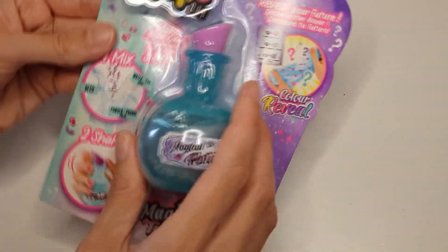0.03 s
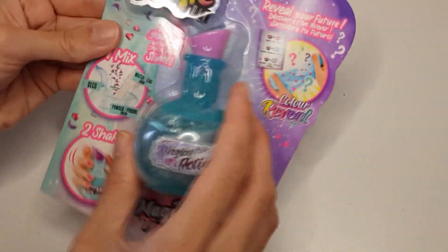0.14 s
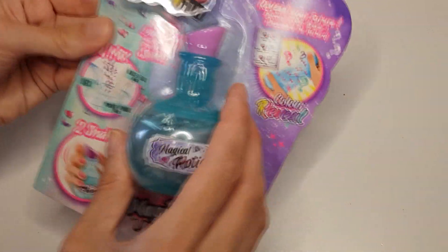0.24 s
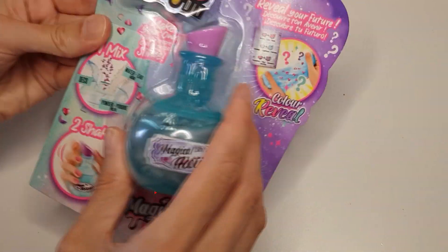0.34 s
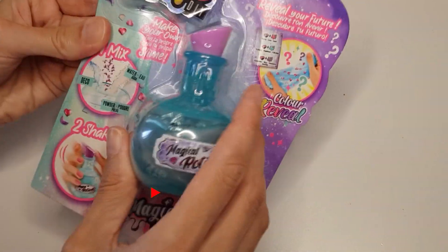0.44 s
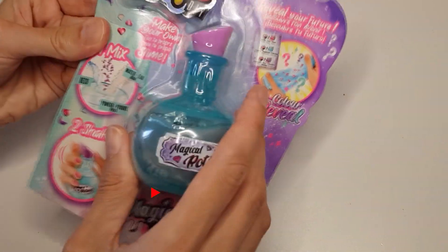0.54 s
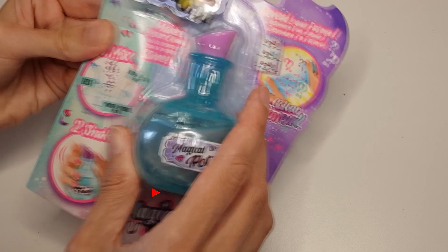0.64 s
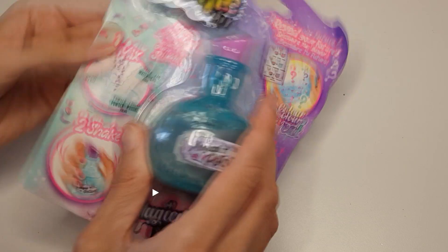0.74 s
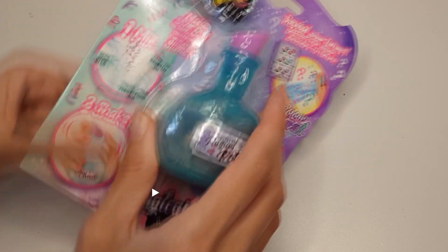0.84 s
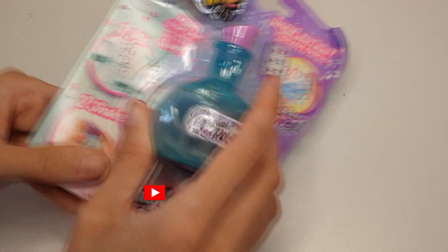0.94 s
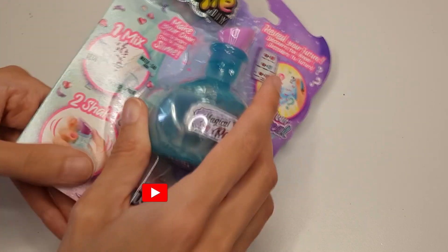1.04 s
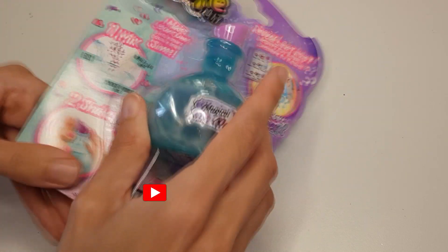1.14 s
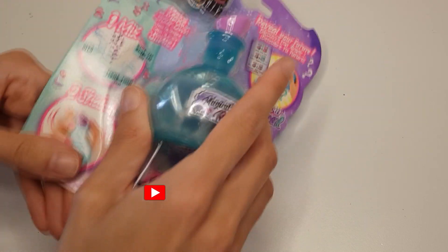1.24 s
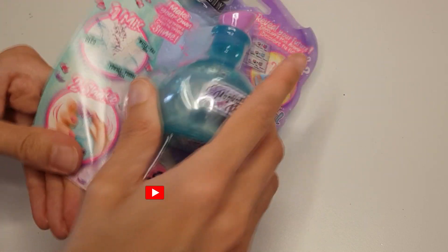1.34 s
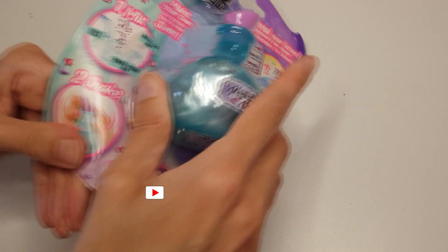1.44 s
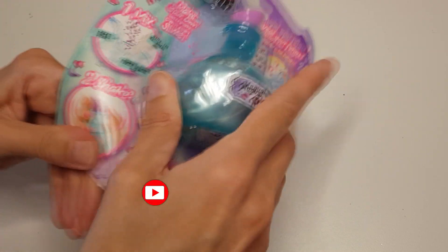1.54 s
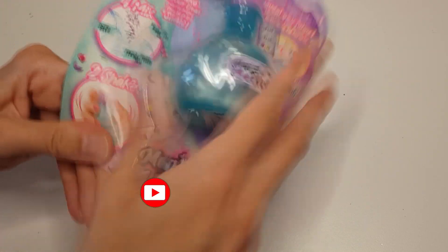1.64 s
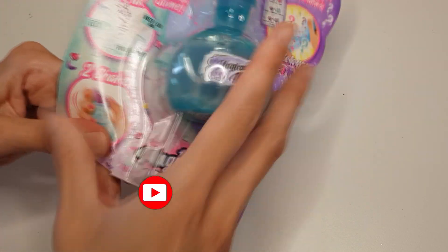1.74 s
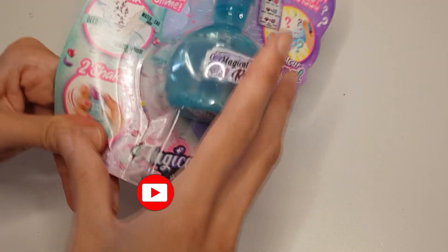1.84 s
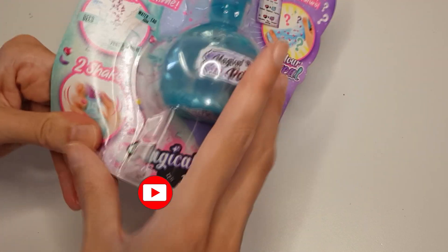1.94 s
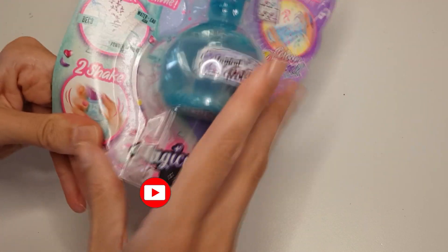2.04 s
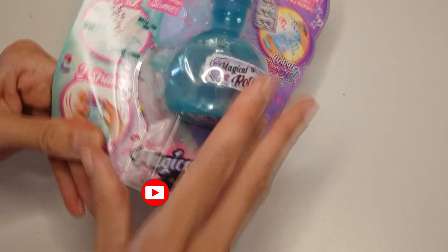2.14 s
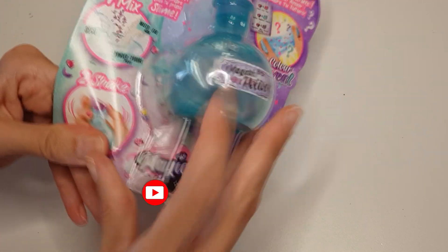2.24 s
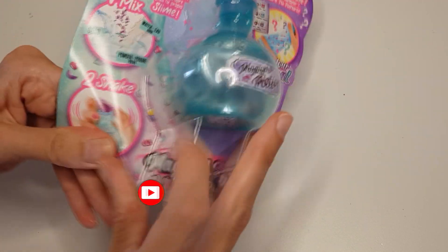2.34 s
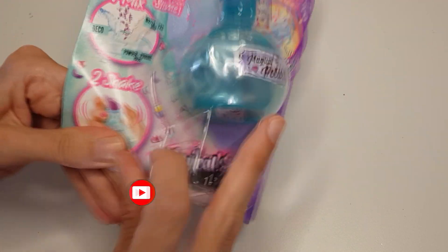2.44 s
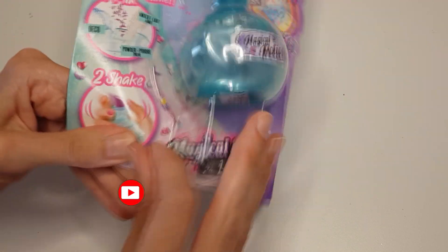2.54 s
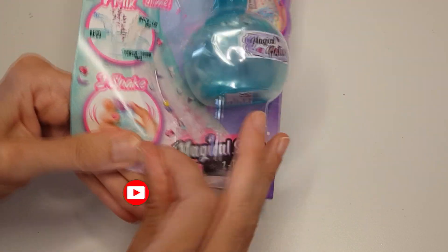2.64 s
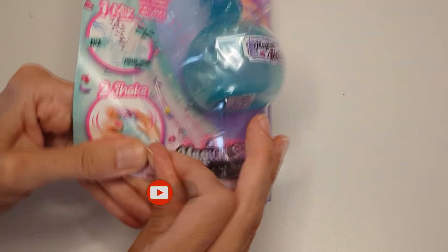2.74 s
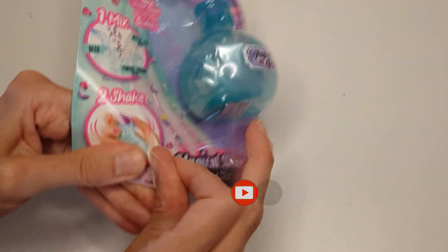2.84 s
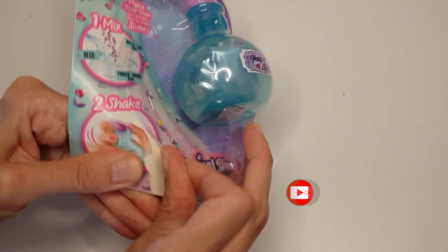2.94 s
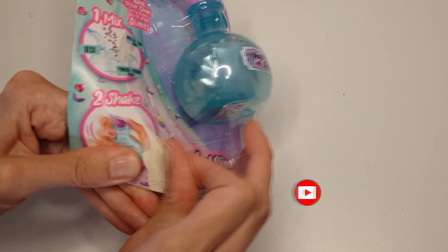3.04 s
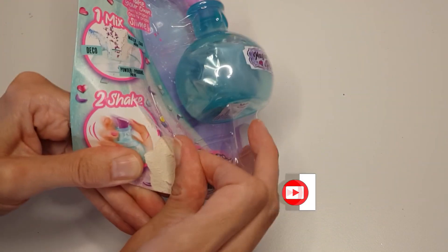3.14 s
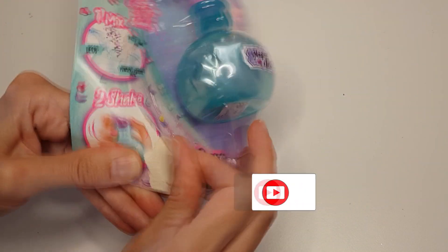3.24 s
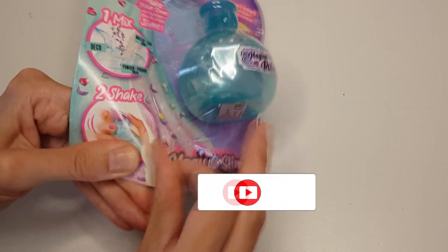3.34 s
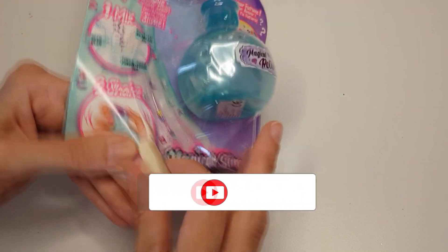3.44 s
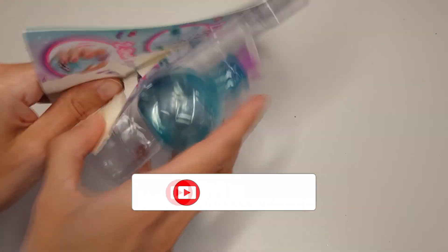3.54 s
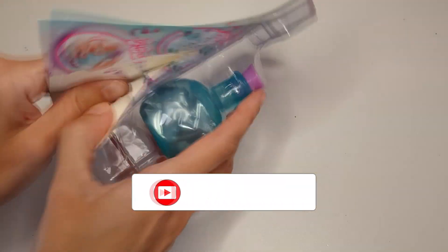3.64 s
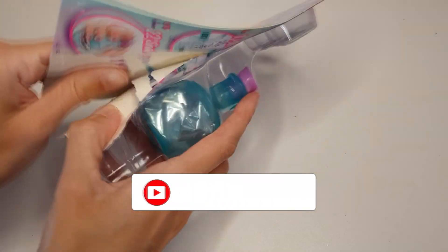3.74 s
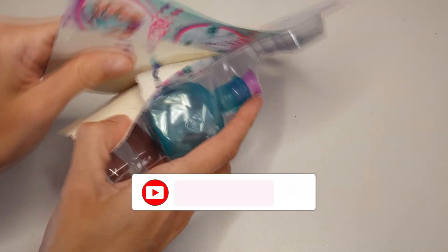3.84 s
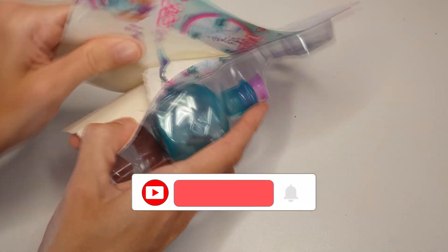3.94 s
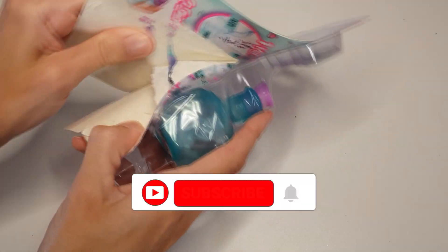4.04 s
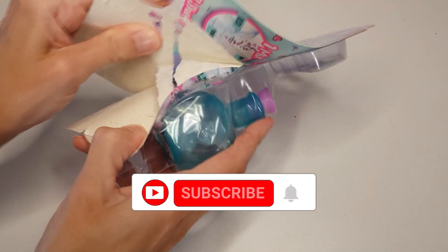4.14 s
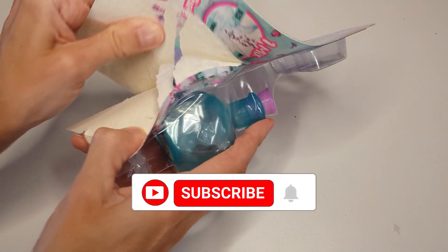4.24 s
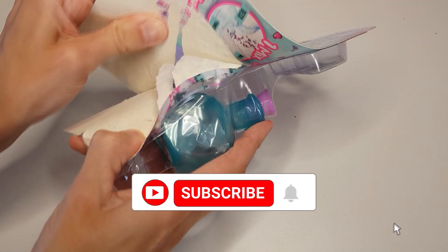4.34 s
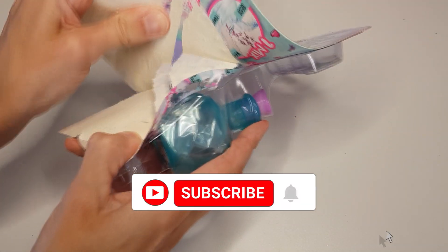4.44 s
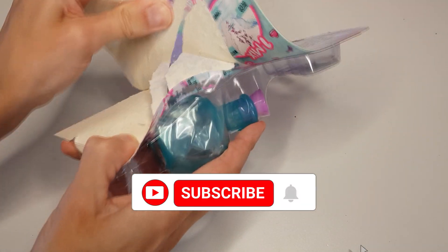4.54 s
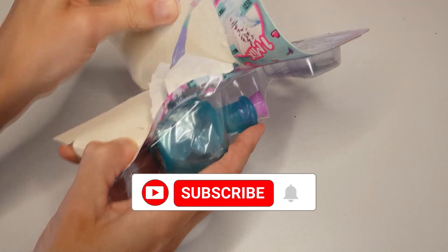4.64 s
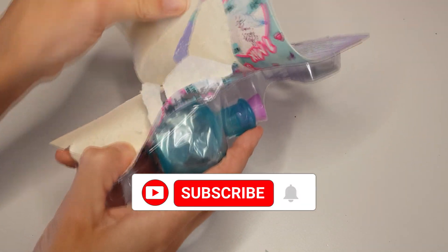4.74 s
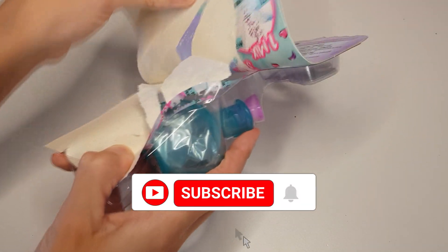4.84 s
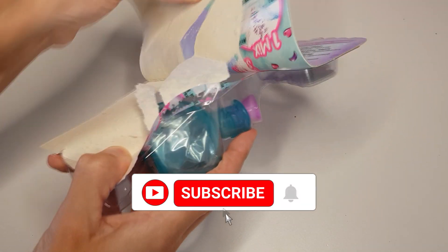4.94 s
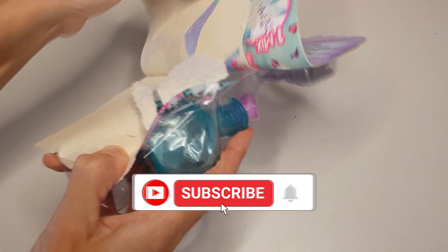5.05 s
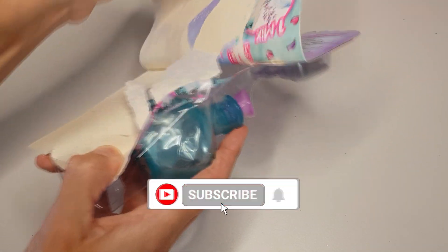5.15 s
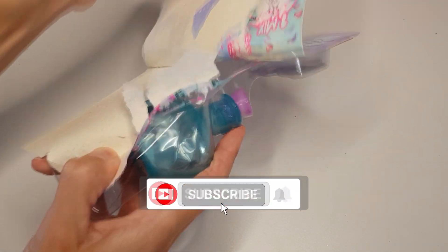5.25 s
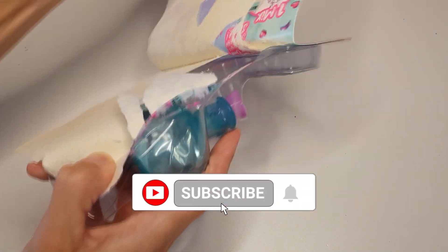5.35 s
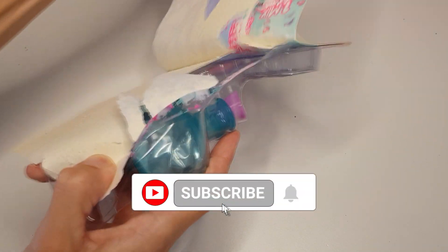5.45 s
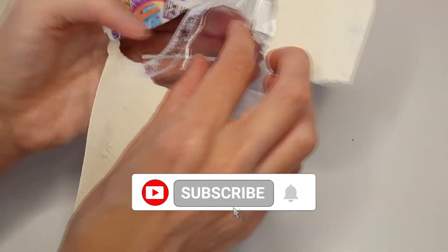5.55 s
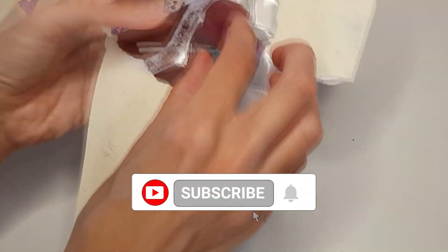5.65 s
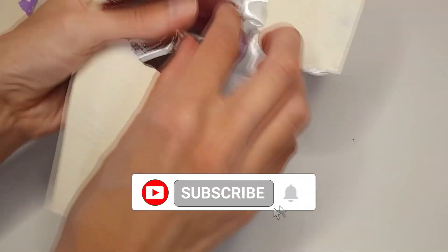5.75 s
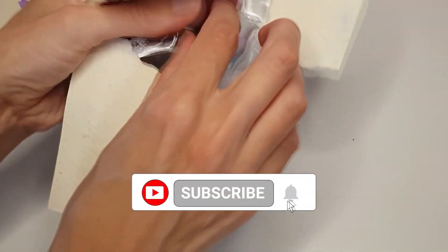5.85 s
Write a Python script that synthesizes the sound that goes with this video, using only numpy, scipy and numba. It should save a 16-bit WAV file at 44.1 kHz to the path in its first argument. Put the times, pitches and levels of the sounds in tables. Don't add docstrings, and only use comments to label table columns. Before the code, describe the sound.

Close and dry above a tabletop: soft skin and card rubs, a small cluster of plastic pops, one bright crack, then peeling ticks and a soft knock. After a loud hollow pop the card snaps and rips in a thick crackle, strongest between four and a half and five and a half seconds. Brief small-room reflections, faint hum, slight breaks at scene changes.

```python
import sys
import numpy as np
from scipy import signal
from scipy.fft import rfft, irfft, next_fast_len
from scipy.io import wavfile
from scipy.ndimage import uniform_filter1d
from numba import njit

SR = 44100
rng = np.random.default_rng(int(sys.argv[2]) if len(sys.argv) > 2 else 0)


def put_to_file(sound):
    columns = np.atleast_2d(sound).T
    safe = np.clip(columns, -1, 1)
    whole_steps = np.round(safe * 32767)
    wavfile.write(sys.argv[1], SR, whole_steps.astype(np.int16))


def elevation(decibels):
    levels = np.asarray(decibels, float)
    return 10 ** (levels / 20)


N = 259515

# frequency in Hz, density in dB per Hz.
HUM_TONE = [(8.8, -41.5), (15, -1.5), (59, 6), (124, 5), (210, -5.5), (298, -5.5), (739, -20.5),
            (1330, -19), (3490, -26), (5260, -28), (7260, -29.5), (15100, -25.5), (16500, -60.5)]
HUM_DB = -67.5
# time in seconds, level in dB.
RUMBLE = [(0.0, -68), (0.8, -60.5), (1.64, -68), (2.8, -65.5), (2.85, -62.5), (4.44, -73), (4.57, -92),
          (5.88, -74)]
EDITS_S = [0, 3.218, 3.52, 5.592, 6]
CUT_S = 0.004
# frequency in Hz, decay by 60 dB in seconds, level in dB.
ROOM = [(196, 0.11, 9), (600, 0.41, -1), (1200, 0.41, -1.5), (2870, 0.46, -4.5), (8000, 0.35, -1),
        (11900, 0.43, 2), (16000, 0.21, 0)]

# start in seconds, level in dB.
KNOCKS = [
    (0.744, -52),
    (1.337, -58.5),
    (2.881, -45.5),
    (5.757, -58),
]
KNOCK_HZ, KNOCK_FADE_S = 170, 0.036
# loudest moment, rise and fall in seconds,
# level in dB, pitch in Hz. Rise and fall of every stroke span 20 dB.
SLIDES = [(.07, 0.64, 0.12, -56, 1870), (.07, 0.45, 0.19, -60.5, 3900), (.4, 0.4, 0.5, -76.5, 5140),
          (1.11, 0.027, 0.066, -65, 5450), (1.11, .03, 0.097, -71, 2550), (1.92, 0.081, 0.098, -70, 4830),
          (1.936, 0.11, 0.078, -73.5, 7050), (2.24, .03, 0.059, -65, 11300), (2.36, .2, 0.11, -65, 1270),
          (2.67, 0.088, 0.5, -72, 3500), (3.74, 0.032, 0.047, -52.5, 1660)]
SLIDE_WIDTH = 0.11
SQUEAK_S, SQUEAK_LENGTH_S, SQUEAK_DB = 2.115, 0.02, -64
SQUEAK_HZ, SQUEAK_SAG_HZ_PER_S = 2100, 40000

BANDS_HZ = [(120, 650), (650, 2400), (2400, 8000), (8300, 17000), (400, 2600)]
PALM, SHELL, CARD, FILM, DENTED_SHELL = range(5)
# frequency in Hz, density in dB per Hz.
PACK_TONE = [(88, -84), (150, -22.5), (260, -17.5), (425, -0.5), (643, -10.5), (723, -1.5), (916, -1.5),
             (1120, -3), (1860, -8), (2550, -7), (3600, -7), (5070, -8.5), (7660, -17), (11600, -4.5),
             (14200, -7.5), (15600, -13), (16500, -66)]

# loudest moment, rise and fall in seconds, level in dB, shell pitch in Hz.
CREAKS = [(.04, 0.49, 0.24, -54, 1760), (.8, 0.026, 0.14, -62, 880), (.938, 0.0128, 0.12, -52.5, 910),
          (.98, .1, 0.12, -59.5, 897), (5.68, 0.032, .05, -48.5, 1200), (1.015, 0.094, 0.046, -56.5, 955),
          (.69, 0.086, .02, -66, 1110), (2.87, 0.16, 0.12, -66.5, 895), (2.9, .03, 0.47, -51.5, 890),
          (3.23, 0.0076, 0.15, -41.5, 1300), (3.27, 0.036, 0.038, -34.5, 900),
          (3.856, 0.013, 0.039, -41, 1490), (3.335, 0.014, 0.3, -49.5, 935),
          (3.568, 0.089, 0.15, -43.5, 1490), (3.725, 0.009, 0.31, -51, 1560),
          (5.767, 0.33, 0.024, -47, 1290), (5.875, 0.097, .1, -40, 1390)]
# loudest moment, rise and fall in seconds, level in dB, card pitch in Hz.
RUBS = [
    (.03, 0.67, 0.29, -60.5, 2200),
    (1.102, 0.016, 0.13, -66, 6800),
    (1.385, 0.09, 0.33, -50.5, 3320),
    (1.595, .03, 0.26, -55.5, 3400),
    (2.02, 0.017, 1.1, -59, 4900),
    (2.9, 0.035, 0.058, -37, 3400),
    (3.53, 0.015, 0.12, -41.5, 2900),
    (3.255, 0.058, 0.12, -48, 3600),
    (3.95, 0.021, 0.3, -47.5, 4800),
    (.74, 0.018, .08, -47, 5200),
]
# loudest moment, rise and fall in seconds, level in dB.
PEELS = [
    (.848, 0.016, 0.052, -49.5),
    (2.402, 0.087, 0.17, -58),
    (2.9, 0.027, 0.44, -55.5),
    (3.07, 0.042, 0.069, -40),
    (3.1, 0.033, 0.052, -41),
    (2.78, .03, .06, -47.5),
    (2.665, 0.036, .08, -47.5),
    (2.894, 0.3, 0.15, -49.5),
    (3.377, 0.04, 0.015, -71),
]
# loudest moment, rise and fall in seconds, level in dB.
GRIPS = [
    (.005, .1, 0.5, -62.5),
    (.8, 0.054, 0.016, -56),
    (1.6, .004, 0.066, -58),
    (2.405, 0.21, 0.18, -58),
    (2.885, 0.016, 0.071, -40),
    (4.55, 0.43, 0.46, -53.5),
    (3.232, 0.019, 0.11, -48),
    (.74, 0.013, .06, -47),
    (0.97, .06, 0.13, -65),
    (3.81, .02, 0.083, -56),
]
# level in dB, for palm, shell, card and film in turn.
CREAK_MIX = (-13, -3.5, -8, -18)
RUB_MIX = (-17.5, -14.5, -7.5, -13.5)
PEEL_MIX = (-15, -14, -9, -3.5)
GRIP_MIX = (1.5, -33, -22, -16)
# time in seconds, effort in dB, shell pitch in Hz.
PULL = [(3.93, -78, 1600), (4.02, -46, 1530), (4.11, -50.5, 1550), (4.16, -45.5, 1330), (4.25, -40.5, 1186),
        (4.31, -44.5, 1410), (4.4, -37, 1250), (4.5, -30.5, 1450), (4.57, -38.5, 1310), (4.62, -31, 1410),
        (4.75, -33.5, 1200), (4.81, -31.5, 1330), (4.92, -40, 1360), (4.995, -43, 1200), (5.015, -47, 1200),
        (5.21, -43, 1200), (5.4, -47, 1150), (5.588, -42.5, 1200)]
PULL_MIX = (-21, -2, -5, -5.5)
PULL_GROWTH = (1.57, 0.97, 0.79, 0.43)
PULL_CARD_HZ = 3740
# loudest moment, rise and fall in seconds, level in dB, shell pitch in Hz.
TUGS = [(5.045, 0.033, .12, -38, 1170), (5.14, 0.22, .12, -37, 1100), (5.248, 0.029, 0.054, -33, 1090),
        (5.225, 0.058, .04, -39, 1126), (5.264, 0.046, 0.048, -27.5, 1150), (5.31, .12, .15, -35.5, 1320),
        (5.42, 0.014, .04, -41, 1480), (5.445, 0.051, 0.056, -37, 1150), (5.477, 0.059, 0.071, -32, 1290),
        (4.24, 0.11, 0.064, -44.5, 1150), (4.81, .05, .06, -40, 1250), (4.98, .12, .03, -38, 1200),
        (5.57, 0.04, 0.11, -47, 1840)]
TUG_MIX = (-18, -0.5, -3, -2)

# start in seconds, level in dB, shell pitch in Hz, card edge in dB.
POPS = [(0.1867, -52, 964, -37), (.6966, -50.5, 950, -13), (.731, -33.5, 790, -8.5),
        (0.7362, -33.5, 820, -21), (0.7499, -24.5, 890, -14.5), (0.7819, -37.5, 845, -16),
        (.931, -49.5, 950, -20), (1.0117, -49, 835, -19), (1.303, -51.5, 850, -24), (2.8553, -37, 865, -29),
        (2.8745, -28.5, 883, -13.5), (3.2416, -35, 1130, -17), (3.263, -32.5, 900, -19),
        (3.3125, -14.5, 961, -34), (1.586, -47.5, 474, -19), (.738, -42, 487, -23), (3.285, -36, 1480, -14),
        (3.359, -35.5, 806, -5), (3.483, -45, 910, -26), (3.7773, -38, 1590, -5.5), (4.01, -41, 1510, -7),
        (4.072, -37.5, 1040, -12), (4.132, -41, 1120, -16), (4.21, -44.5, 1140, -10),
        (4.319, -44, 1280, -5), (4.394, -44, 1150, -6), (4.431, -43, 1160, -8), (4.474, -32, 1220, 0),
        (4.711, -39, 1080, -3), (4.858, -39, 1260, -10), (4.892, -37, 1320, -10), (4.944, -35, 1160, -12),
        (5.139, -32, 990, -10), (4.598, -31, 1500, -1), (4.6334, -28.5, 1270, -2), (4.681, -30, 1800, -6),
        (4.793, -28.5, 1350, -11), (5.099, -29, 1100, 1.5), (5.242, -27, 1105, -4), (5.42, -36, 1500, -10),
        (5.4654, -31, 1300, -5), (5.6094, -37.5, 1250, -5), (5.6423, -44.5, 1090, -3.5),
        (5.7556, -40.5, 580, 4), (5.8561, -39.5, 1160, 0.5)]
POP_CARD_HZ, POP_FILM_DB, POP_DULLING = 4300, 3.5, 0.42
# start in seconds, level in dB, card pitch in Hz, shell pitch in Hz.
SNAPS = [(1.511, -52.5, 4300, 1540), (1.5852, -33.5, 4240, 1970), (1.5994, -45, 4430, 970),
         (2.8812, -21, 3044, 1200), (3.231, -67, 3350, 447), (3.3125, -24, 2730, 2000),
         (3.5326, -40, 3720, 1680), (3.571, -30.5, 4740, 1410), (3.6126, -28.5, 3560, 1810),
         (3.719, -38.5, 3500, 1590), (3.7544, -37, 3200, 1650), (3.8492, -37, 3460, 1430),
         (3.925, -45, 4270, 1640), (3.9431, -35, 3660, 1770), (3.934, -44, 3500, 1610),
         (3.976, -48, 3460, 1670), (4.027, -36.5, 3860, 1230), (4.048, -39, 4300, 1690),
         (4.1087, -40.5, 3200, 1590), (4.1583, -43, 3600, 1310), (5.727, -45, 5000, 1900),
         (4.0, -42, 3430, 1600), (4.0167, -36, 3560, 1620), (4.085, -28, 3900, 1940),
         (4.257, -41, 4300, 1190), (4.4487, -35, 4040, 1310), (5.7181, -39.5, 2530, 1160)]
SNAP_SHELL_DB, SNAP_FILM_DB, SNAP_FILM_DB_PER_OCTAVE = -3.5, -7, 14
# start in seconds, level in dB, share of the card in dB.
TICKS = [(1.4456, -37.5, -26.5), (2.324, -66, 10.5), (2.406, -41, -15), (2.5865, -42, -33),
         (2.607, -33, -43), (2.618, -38, -28), (2.6218, -28, -42), (2.5678, -58, -30), (2.6718, -42, -10),
         (2.8693, -28.5, -14), (2.9938, -52, -15), (3.0492, -44, -15), (3.365, -52, -6), (2.657, -38, -15),
         (2.668, -34.5, -14), (2.7622, -35.5, -12), (2.778, -38, -12), (2.8113, -35.5, -12),
         (2.826, -34.5, -11.5), (3.0171, -34.5, -10), (3.0626, -30, -20), (3.073, -28, -10),
         (3.082, -33, -9), (3.0975, -35.5, 0), (3.1595, -47.5, -5), (3.192, -50, -11), (2.213, -51.5, -9),
         (3.9597, -37.5, 6), (3.9826, -41, 8.5), (4.059, -28, -4.5)]
TICK_CARD_HZ, TICK_SHELL_HZ, TICK_SHELL_DB = 4200, 1100, -36
# start in seconds, level in dB,
# share of the shell in dB, shell pitch in Hz, card pitch in Hz.
CRACKS = [(1.3359, -17, -8, 1010, 5740), (2.8642, -37, -7, 920, 3440), (3.3711, -32.5, -12, 765, 2860),
          (4.339, -31, -15, 1610, 5060), (4.51, -28.5, -3.5, 1800, 3340), (4.54, -41, -0.5, 1820, 4200),
          (4.7696, -10.5, -15.5, 1030, 5040), (4.8383, -18, -23, 1210, 5270),
          (4.8726, -29.5, -3.5, 1280, 3610), (4.9106, -30.5, -8, 1240, 4150), (4.9694, -40, 1, 1200, 3300),
          (4.2958, -37, -16, 1270, 3990), (4.368, -30.5, -11, 1330, 3820), (4.6217, -29, -18, 1540, 4150),
          (4.694, -27.5, -13, 1510, 3970), (5.346, -32, -9, 1420, 3560), (5.566, -38, 5.5, 1850, 4080),
          (5.0423, -35, -4, 1130, 2800), (5.0603, -21, -17, 1130, 3920), (5.261, -21.5, -1, 1150, 5200),
          (5.478, -33.5, 5, 1490, 3240), (5.574, -32.5, -23, 1180, 5760)]
CRACK_CARD_DB = -3.5


def unit(x):
    return x / np.sqrt(np.mean(x ** 2))


def crest(x):
    return x / np.abs(x).max(axis=-1, keepdims=True)


def colour(x, spectrum):
    hz, db = np.transpose(spectrum)
    n = next_fast_len(x.shape[-1])
    f = np.maximum(np.arange(n // 2 + 1) * SR / n, 1)
    gain = elevation(np.interp(np.log(f), np.log(hz), db))
    return irfft(rfft(x, n) * gain, n)[..., :x.shape[-1]]


def band(x, part):
    return signal.sosfilt(signal.butter(4, BANDS_HZ[part], "bandpass", fs=SR, output="sos"), x)


def walk(rate):
    hold = int(SR / rate)
    steps = np.repeat(rng.standard_normal(N // hold + 1), hold)
    return 0.68 * uniform_filter1d(uniform_filter1d(steps, hold), hold)[:N]


@njit
def resonate(x, hz, width):
    y, b, l = np.empty(len(x)), 0., 0.
    for i in range(len(x)):
        g, k = np.tan(np.pi * hz[i] / SR), width / hz[i]
        v = (b + g * (x[i] - l)) / (1 + g * (g + k))
        b, l, y[i] = 2 * v - b, l + 2 * g * v, k * v
    return y


def hum():
    s, db = np.transpose(RUMBLE)
    floor = unit(colour(rng.standard_normal(N), HUM_TONE)) * elevation(HUM_DB + 0.5 * walk(18.0))
    low = signal.sosfilt(signal.butter(2, 110, fs=SR, output="sos"), floor)
    swell_db = np.interp(np.arange(N) / SR, s, db) - HUM_DB
    return floor + low * (elevation(swell_db) - 1)


def cuts():
    t = np.arange(N) / SR
    return np.prod([np.clip(np.abs(t - s) / CUT_S, 0, 1) for s in EDITS_S[1:-1]], axis=0)


def room(x, wet_db, gap_s):
    t = np.arange(SR // 2) / SR
    hz, t60, db = np.transpose(ROOM)
    tail = 0
    for centre in 180 * 2 ** np.arange(0, 6.6, 0.5):
        edges = [centre / 2 ** 0.25, centre * 2 ** 0.25]
        sos = signal.butter(2, edges, "bandpass", fs=SR, output="sos")
        fade_db = np.interp(centre, hz, db) - 60 * t / np.interp(centre, hz, t60)
        tail = tail + signal.sosfilt(sos, rng.standard_normal(len(t))) * elevation(fade_db)
    tail = tail * (1 - np.exp(-(t / gap_s) ** 2)) * (1 + 3.24 * np.exp(-t / 0.0032))
    tail = tail * elevation(wet_db) / np.sqrt(np.sum(tail ** 2))
    cut = np.minimum((np.array(EDITS_S) * SR).astype(int), N)
    shots = [signal.fftconvolve(x[a:b], tail)[:b - a] for a, b in zip(cut, cut[1:])]
    return np.concatenate(shots)


def knocks():
    t = np.arange(N) / SR
    wood = unit(resonate(rng.standard_normal(N), np.full(N, 1. * KNOCK_HZ), 150.))
    return wood * sum(elevation(db) * (t > s) * np.exp(-np.abs(t - s) / KNOCK_FADE_S) for s, db in KNOCKS)


def stroke(t, s, rise, fall, db):
    return db - 20 * np.maximum((s - t) / rise, (t - s) / fall)


def slides():
    t, out = np.arange(N) / SR, 0
    skin = rng.standard_normal(N)
    for *shape, hz in SLIDES:
        singing = unit(resonate(skin, np.full(N, 1. * hz), SLIDE_WIDTH * hz))
        out = out + singing * elevation(stroke(t, *shape))
    u = np.clip(t - SQUEAK_S, 0, SQUEAK_LENGTH_S)
    tone = np.sin(2 * np.pi * (SQUEAK_HZ - SQUEAK_SAG_HZ_PER_S * u / 2) * u)
    return out + elevation(SQUEAK_DB) * tone * np.sin(np.pi * u / SQUEAK_LENGTH_S)


def hands():
    t = np.arange(0, N, 64) / SR
    s, effort, pull_hz = np.transpose(PULL)
    pull = np.interp(t, s, effort, -140, -140)
    pull_db = np.c_[PULL_MIX,] - 36 + np.c_[PULL_GROWTH,] * (pull + 36)
    power = elevation(2 * pull_db) + 1e-10
    pitch = np.array([power[SHELL] * np.interp(t, s, pull_hz), power[CARD] * PULL_CARD_HZ])
    weight = power[SHELL:FILM].copy()
    strokes = ((CREAKS, CREAK_MIX, SHELL), (TUGS, TUG_MIX, SHELL), (RUBS, RUB_MIX, CARD),
               (PEELS, PEEL_MIX, None), (GRIPS, GRIP_MIX, None))
    for rows, mix, pitched in strokes:
        for row in rows:
            shake = elevation(2 * (stroke(t, *row[:4]) + np.c_[mix,]))
            power = power + shake
            if pitched is not None:
                pitch[pitched - SHELL] += shake[pitched] * row[4]
                weight[pitched - SHELL] += shake[pitched]
    curves = (*10 * np.log10(power), *pitch / weight)
    return [np.interp(np.arange(N) / SR, t, c) for c in curves]


def fibres(rate, spread_db, tail_s):
    chance = rng.random((2, N))
    size_db = spread_db * np.minimum(-np.log(1 - chance[1]), 3.2)
    snaps = (chance[0] < rate / SR) * elevation(size_db)
    smear = signal.lfilter([1], [1, -np.exp(-1 / (tail_s * SR))], snaps)
    return smear * rng.standard_normal(N)


def tearing():
    *levels, shell_hz, card_hz = hands()
    shell_hz = shell_hz * 2 ** (0.12 * walk(9))
    card_hz = card_hz * 2 ** (0.12 * walk(9))
    share = np.clip((levels[CARD] + 72) / 30, 0.1, 0.8)
    snaps = np.sqrt(share) * unit(fibres(2000., 3.2, 0.0004)) + np.sqrt(1 - share) * rng.standard_normal(N)
    own = unit(fibres(2400.0, 1.8, 0.00043))
    drives = (own[::-1], 0.68 * snaps + 0.72 * own[::-1], snaps, 0.89 * snaps + 0.6 * own)
    parts = [unit(band(colour(x, PACK_TONE), part)) for part, x in enumerate(drives)]
    parts[SHELL] = unit(resonate(parts[SHELL], 1.253 * shell_hz, 1300.0))
    shell_creak = unit(resonate(snaps, shell_hz * 2 ** (0.25 * walk(25)), 150.))
    parts[SHELL] = unit(parts[SHELL] + 0.9 * shell_creak)
    card_creak = unit(resonate(snaps, card_hz * 2 ** (0.078 * walk(36)), 490.0))
    parts[CARD] = unit(parts[CARD] + 0.68 * card_creak)
    stutter_db = 0.9 * walk(40) + 1.3 * walk(150)
    trims_db, flickers_db = (-5.0, -4.0, -3.5, -4.0), (2.7, 3.3, 2.8, 1.6)
    out = 0
    for x, db, trim_db, flicker_db in zip(parts, levels, trims_db, flickers_db):
        out = out + x * elevation(db + trim_db + stutter_db + flicker_db * walk(60))
    return out


def buckles():
    rows = []
    for s, db, hz, edge in POPS:
        film_db = db + edge + POP_FILM_DB - POP_DULLING * (db + 44)
        rows.append((s, film_db, db, hz, db + edge, POP_CARD_HZ))
    for s, db, hz, low in SNAPS:
        film_db = db + SNAP_FILM_DB + SNAP_FILM_DB_PER_OCTAVE * np.log2(hz / 4000)
        rows.append((s, film_db, db + SNAP_SHELL_DB, low, db, hz))
    for s, db, card in TICKS:
        rows.append((s, db, db + TICK_SHELL_DB, TICK_SHELL_HZ, db + card, TICK_CARD_HZ))
    for s, db, shell, low, hz in CRACKS:
        rows.append((s, db, db + shell, low, db + CRACK_CARD_DB, hz))
    return sorted(rows)


def cracks():
    s, film_db, shell_db, shell_hz, card_db, card_hz = np.transpose(buckles())[:, :, None]
    size = 1024
    t, f = np.arange(size) / SR, np.arange(size // 2 + 1) * SR / size
    chance = rng.standard_normal((len(s), 4, size))
    onset = 1 - np.exp(-(t / 0.0008) ** 2)
    splinter = chance[:, :3] * np.abs(chance[:, 3:]) ** 0.6 * onset
    click = np.tile(1. * (np.arange(size) == 200), (len(s), 1))

    def shell_tone(x):
        bell = 1 + 1j * (f / shell_hz - shell_hz / (f + 1)) / 0.71
        return band(irfft(rfft(x) / bell), DENTED_SHELL)

    def card_tone(x):
        return irfft(rfft(band(x, CARD)) / (1 + (f / (1.57 * card_hz)) ** 4))

    def film_tone(x):
        return colour(band(x, FILM), PACK_TONE)

    longer = elevation(0.014 * (np.maximum(shell_db, card_db) + 37.0))

    def burst(tone, part, fade_s):
        return crest(tone(splinter[:, part] * np.exp(-(t / (fade_s * longer)) ** 1.25)))

    shell_phase = 2 * np.pi * shell_hz * t + 0.47 * np.sin(2.465 * shell_hz * t)
    shell_ring = crest(np.sin(shell_phase) * t * np.exp(-t / 0.0013))
    card_ring = crest(np.sin(2 * np.pi * card_hz * t) * t * np.exp(-t / 0.00054))
    first_spike = 0.84 + 0.57 * np.exp(-((t - 0.001) / 0.00025) ** 2)
    layers = ((shell_tone, 0.86 * burst(shell_tone, 0, 0.0032) + shell_ring, shell_db + 4.0),
              (card_tone, burst(card_tone, 1, 0.0024) + 0.68 * card_ring, card_db + 2.0),
              (film_tone, burst(film_tone, 2, 0.002) * first_spike, film_db - 0.5))
    near, far = np.zeros((2, N + size))
    at = (s * SR + 8).astype(int) + np.arange(size)
    for tone, x, db in layers:
        x = elevation(db) * crest(x)
        blow = tone(click)
        blow = blow * np.std(x, axis=1, keepdims=True) / np.std(blow, axis=1, keepdims=True)
        np.add.at(near, at, x)
        np.add.at(near, at - size, 0.06 * x[:, ::-1])
        np.add.at(far, at, 0.5 * x + 0.97 * blow)
    return near[:N], far[:N]


def scene():
    tear = tearing()
    near, far = cracks()
    wet = room(far + 0.89 * tear, wet_db=-8.5, gap_s=0.00009)
    shots = near + tear + wet + slides() + knocks()
    return (shots * cuts() + hum())[None]


def low_pass(x):
    return signal.sosfilt(signal.butter(12, 16870, fs=SR, output="sos"), x)


def record(dry):
    top = signal.ellip(7, 0.3, 24, 15900, fs=SR, output="sos")
    mix = signal.sosfilt(top, dry)
    return low_pass(mix)


dry = scene()
out = record(dry)
put_to_file(out)
```